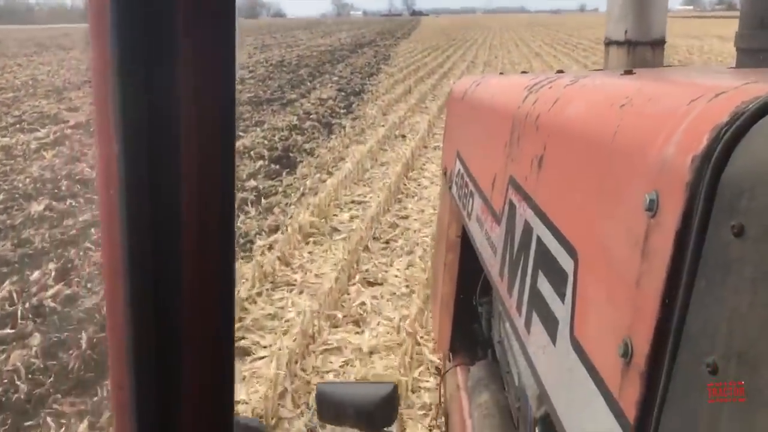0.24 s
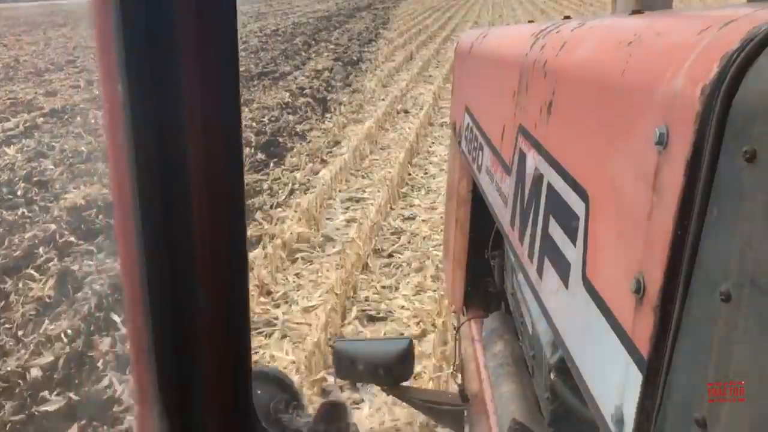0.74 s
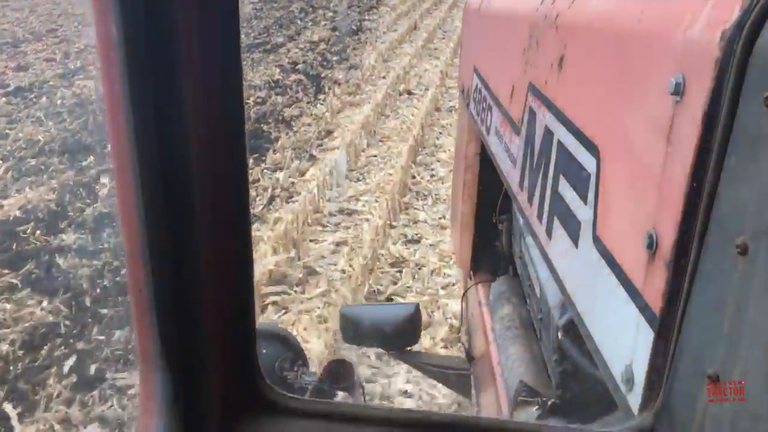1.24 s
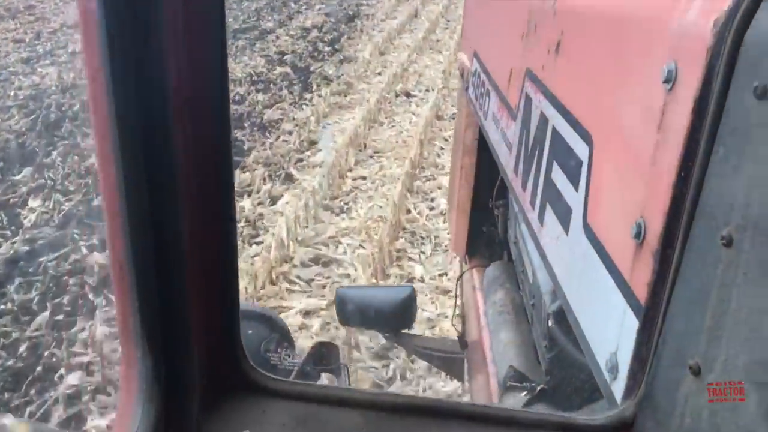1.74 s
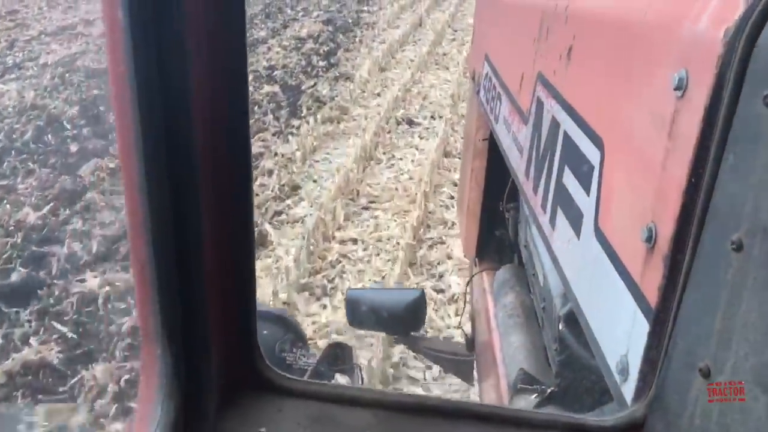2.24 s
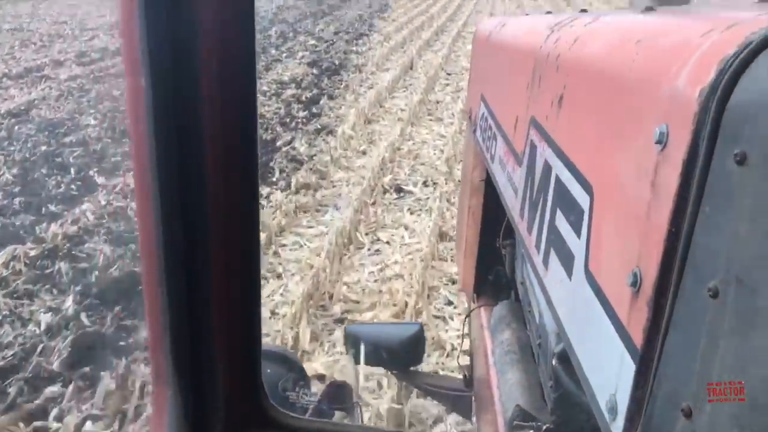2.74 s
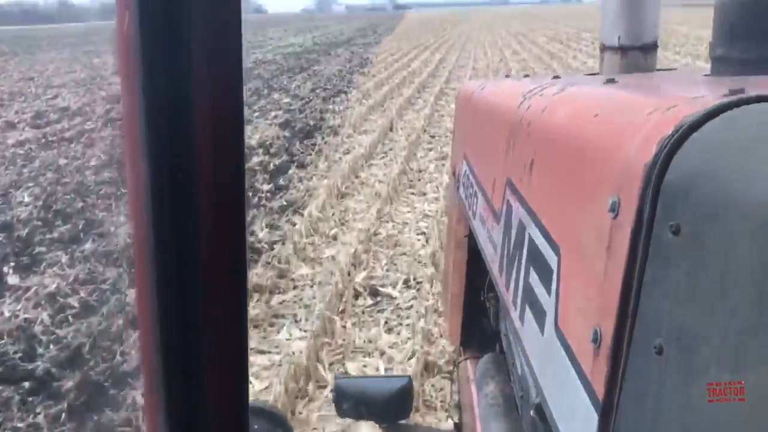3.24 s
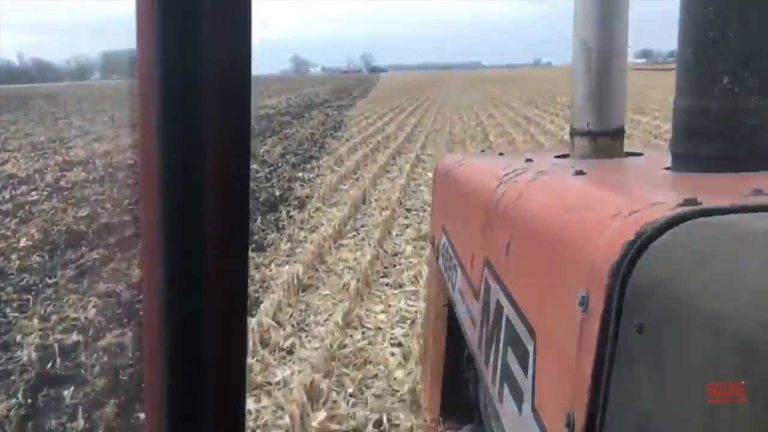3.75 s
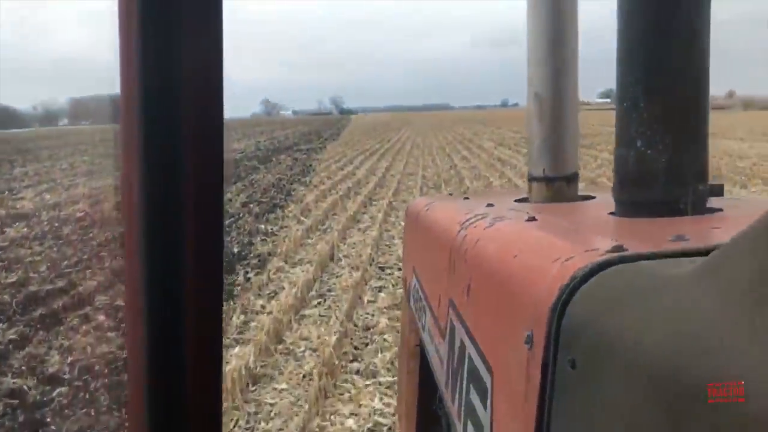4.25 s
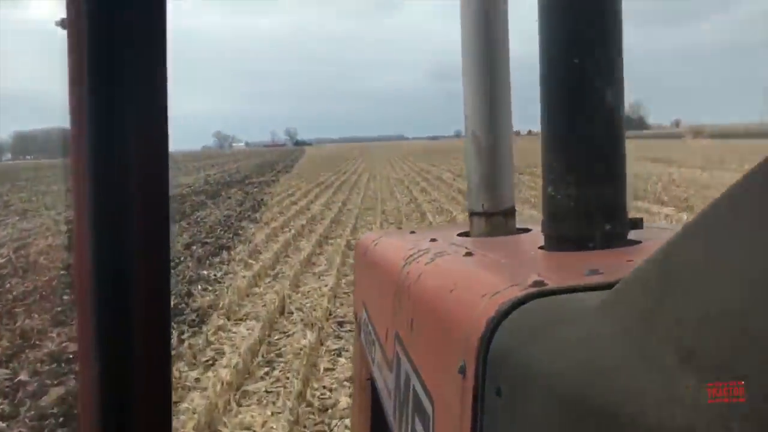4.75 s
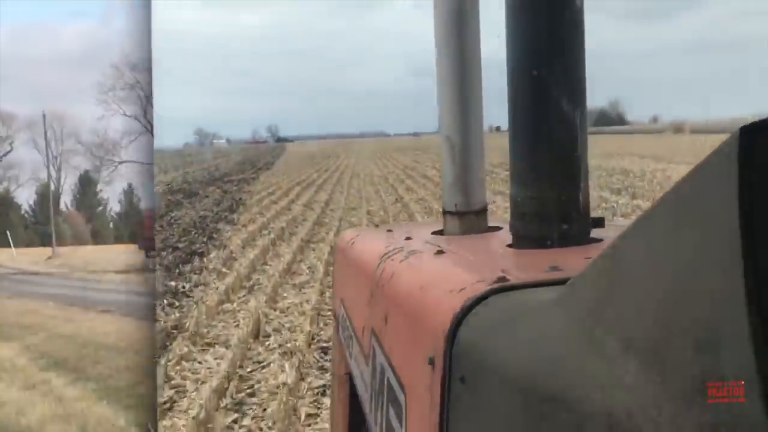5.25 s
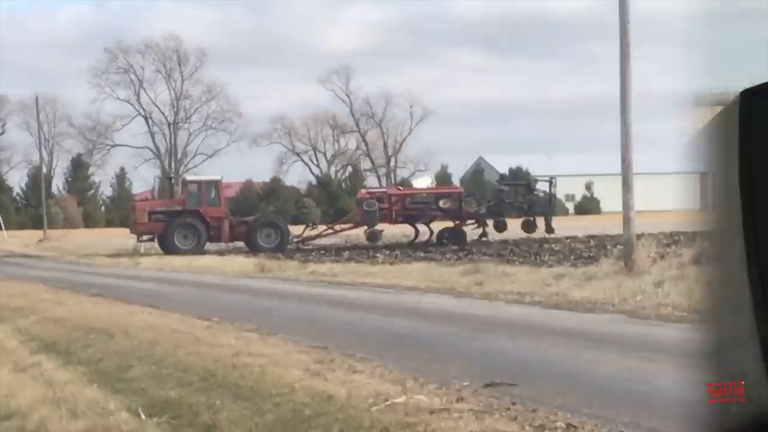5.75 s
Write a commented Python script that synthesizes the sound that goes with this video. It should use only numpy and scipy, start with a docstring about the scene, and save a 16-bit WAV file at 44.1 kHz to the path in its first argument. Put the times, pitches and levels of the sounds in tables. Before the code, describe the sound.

From the start, a large diesel engine drones loudly inside a closed tractor cab, at almost constant speed and load. A strong low firing tone, around 170 hertz, sits among many buzzing engine harmonics, with rough combustion clatter, fan rush and thin mechanical whines above. The small cab adds a short, boxy resonance, and pitch and level waver only slightly. Near 1.1 seconds a tiny trim rattle ticks. From about 3 to 4.7 seconds the handheld microphone turns from the door toward the windscreen; the main tone gradually sinks, other harmonics come forward, and the treble becomes duller. A few more faint rattles come between 5.0 and 5.25 seconds. From 5 seconds the cab smoothly fades away, replaced by 6 seconds with a quieter, distant tractor outdoors: a bassy, gusty, uneven rumble with two low exhaust tones and little treble.

```python
"""Inside the cab of a large V8 diesel tractor at near-steady load: orders of the engine cycle hum under a loud
firing tone (summed cosines), over combustion clatter and fan rush (filtered noise), with a few rattles of trim.
From about 3 s the microphone turns to the windscreen, which rebalances the orders and the noise and sinks the tone.
After 5 s the cab fades out and a tractor far across a field (coloured noise and two steady tones) fades in."""
import sys
import numpy as np
from scipy import signal
from scipy.fft import rfft, irfft, next_fast_len
from scipy.io import wavfile
from scipy.ndimage import uniform_filter1d

SR = 44100
rng = np.random.default_rng(int(sys.argv[2]) if len(sys.argv) > 2 else 0)


def gain_from_db(level_db):
    """Turn a decibel level (scalar or array-like) into a linear amplitude factor."""
    decades = np.asarray(level_db, float) / 20
    return 10 ** decades


def int16_out(signal):
    """Quantize to a 16-bit WAV file."""
    q = np.round(np.clip(np.atleast_2d(signal).T, -1, 1) * 32767)
    wavfile.write(sys.argv[1], SR, q.astype(np.int16))


N = 264625
CYLINDERS = 8  # each fires once an engine cycle


def curve(table):
    """Linear interpolation in time: each column of a table, one value a sample."""
    s, *columns = np.transpose(table)
    return [np.interp(np.arange(N) / SR, s, c) for c in columns]


def unit(x):
    """Normalisation by power: scaled to rms 1."""
    return x / np.sqrt(np.mean(x ** 2))


def walk(rate):
    """Low-passed random process: levels held 1 / rate seconds, smoothed twice, rms 1."""
    hold = int(SR / rate)
    levels = np.repeat(rng.standard_normal(N // hold + 1), hold)
    smooth = uniform_filter1d(uniform_filter1d(levels, hold), hold)
    return unit(smooth[:N])


def colour(x, points):
    """Linear filtering in the frequency domain: a gain in dB interpolated over log frequency."""
    size = next_fast_len(N)
    hz, db = np.transpose(points)
    bins_hz = np.arange(size // 2 + 1) * SR / size
    gain = gain_from_db(np.interp(np.log(bins_hz + 1), np.log(hz), db))
    return irfft(rfft(x, size) * gain, size)[:N]


def far_tractor():
    """Distant source: noise with little treble, in lumpy gusts, and two exhaust tones with wandering levels."""
    # Spectrum of the far engine. Each row: frequency in Hz, relative level in dB
    far_noise = [(18, -37), (35, 1.5), (75, 0), (140, -3.5), (200, -12), (300, -21.5), (800, -17),
                 (1200, -20.5), (1600, -13), (1900, -21), (2300, -24), (2700, -47), (3300, -32),
                 (4200, -50), (6000, -53), (9000, -66)]
    # Exhaust tones. Each row: frequency in Hz, amplitude in dB relative to the rms of the noise before its gusts
    far_tones = [(72, -1), (142, -3.5)]
    far_gain_db = -34
    t = np.arange(N) / SR
    noise = unit(colour(rng.standard_normal(N), far_noise)) * gain_from_db(2.0 * walk(20))
    tones = np.zeros(N)
    for hz, db in far_tones:
        tones += gain_from_db(db + 2.0 * walk(17)) * np.sin(2 * np.pi * hz * t)
    return gain_from_db(far_gain_db) * (noise + tones)


def rattles(decay_s=0.015):
    """Resonant response to impacts: short noise bursts through the resonances of loose cab trim."""
    # Short rattles. Each row: start in seconds, peak of the burst envelope in dB
    bursts = [(1.0984, -37), (5.004, -37.5), (5.2002, -37), (5.243, -35)]
    # Trim resonances. Each row: frequency in Hz, width in Hz, rms of the band in dB before the envelope
    trim = [(3400, 500, -11.5), (5070, 1800, -24), (6800, 1500, -40)]
    t, envelope = np.arange(N) / SR, np.zeros(N)
    for s, db in bursts:
        age = np.clip(t - s, 0, None) / decay_s
        envelope += gain_from_db(db) * age * np.exp(1 - age)
    noise = rng.standard_normal(N)
    ringing = np.zeros(N)
    for hz, width, db in trim:
        b, a = signal.iirpeak(hz, hz / width, fs=SR)
        ringing += gain_from_db(db) * unit(signal.lfilter(b, a, noise))
    return envelope * ringing


def cab_space(x, count=20):
    """Reverberation of a small enclosure: dense decaying reflections, varying as the hand-held microphone moves."""
    echo_db, t60_s = -9, .15
    t = np.arange(int(.2 * SR)) / SR
    place = np.arange(N) / N * (count - 1)
    out = np.zeros(N)
    for k in range(count):
        echoes = rng.standard_normal(len(t)) * np.exp(-np.log(1000) * t / t60_s)
        echoes = echoes / np.linalg.norm(echoes)
        fade = np.cos(np.clip(place - k, -1, 1) * np.pi / 2)  # crossfade between neighbouring patterns
        out += fade * signal.oaconvolve(x, echoes)[:N]
    return unit(x + gain_from_db(echo_db) * out)


def panels(x):
    """Modal response: resonance peaks and dips of the cab panels and glass as bell-shaped gains."""
    # Resonances and dips. Each row: frequency in Hz, width in Hz, gain at the centre in dB
    modes = [(454, 33, -1.5), (476, 270, 0.5), (743, 34, -2.5), (816, 82, -1.5), (1026, 76, 1),
             (1366, 35, 3.5), (1700, 28, -0.5), (1980, 430, 2), (2555, 30, -1), (2760, 150, -3.5),
             (3570, 300, 1), (4940, 500, -4), (7560, 500, -4), (8060, 300, -1), (10500, 510, -5.5)]
    size = next_fast_len(N)
    f = np.arange(size // 2 + 1) * SR / size
    gain_db = sum(db / (1 + (2 * (f - hz) / width) ** 2) for hz, width, db in modes)
    return irfft(rfft(x, size) * gain_from_db(gain_db), size)[:N]


def clatter(cycle, turn, repeat=0.28, beat_db=0.6, flicker_db=.5):
    """Cyclostationary noise: combustion knock and fan rush, part of it repeating each engine cycle."""
    # Cab noise facing the door, then the windscreen. Each row: frequency in Hz, relative level in dB per Hz
    door_noise = [(15, -58), (28, -8), (45, -12), (120, -13.5), (220, -21.5), (274, -19), (389, -12),
                  (509, -24), (970, -15), (1900, -20), (3260, -37.5), (4900, -44), (11800, -49.5),
                  (15500, -58)]
    screen_noise = [(15, -53), (28, -21), (45, -4), (100, -9.5), (190, -13.5), (281, -18), (399, -27.5),
                    (523, -22), (1450, -19.5), (2360, -29), (3830, -47.5), (6000, -47.5), (12200, -54),
                    (15500, -61)]
    glass_ms, glass_share = .38, 0.085  # delay and amplitude of the reflection
    pattern = rng.standard_normal(2048)  # one engine cycle of knock
    locked = pattern[(cycle / (2 * np.pi) % 1 * 2048).astype(int)]
    # the noise swells slightly once each engine cycle, away from the crest of the low orders
    swell_db = beat_db * np.cos(cycle + 2.2) + flicker_db * walk(7.3)
    rush = rng.standard_normal(N) * gain_from_db(swell_db) + repeat * locked
    rush = cab_space(rush)
    # the treble flickers on its own
    low = signal.sosfilt(signal.butter(2, 4000, fs=SR, output="sos"), rush)
    treble = (rush - low) * gain_from_db(.45 * walk(12))
    rush = panels(low + treble)
    door, screen = unit(colour(rush, door_noise)), unit(colour(rush, screen_noise))
    noise = (1 - turn) * door + turn * screen
    # a pane close to the microphone reflects the sound and combs the treble
    return noise + glass_share * np.roll(noise, int(glass_ms * SR / 1000))


def hum(cycle, turn):
    """Fourier series of a periodic source: uneven cylinders excite multiples of the cycle; shaking panels waver them."""
    # Engine orders facing the door, then the windscreen. Each row: multiple of the cycle rate, relative level in dB
    door_orders = [(2, -13), (3, -13), (4, -13), (5, -13), (6, -11), (7, -14), (9, -18), (10, -17),
                   (11, -16), (12, -26), (13, -22), (14, -22), (15, -22), (16, -16), (17, -25), (18, -21),
                   (19, -20), (20, -25)]
    screen_orders = [(2, -16), (3, -12), (4, -21), (5, -12), (6, -10), (7, -15), (9, -15), (10, -14),
                     (11, -10), (12, -27), (13, -24), (14, -13), (15, -30), (16, -5), (17, -31), (18, -28),
                     (19, -22), (20, -27)]
    # Gear and pump whines locked to the crank. Each row: multiple of the cycle rate, relative level in dB
    # facing the door, relative level in dB facing the windscreen
    whines = [(17.6, -21.5, -23), (19.33, -22, -27), (31.22, -25.5, -21.5), (34.15, -20.5, -26),
              (39.52, -26.5, -24.5), (42.65, -26.5, -31), (45.1, -18, -35), (58.06, -23.5, -17.5),
              (76.6, -25.5, -23), (114, -51, -52)]
    waver_db, slip_rad = 1.2, .55  # rms wander of each order
    out = np.zeros(N)
    for (k, door_db), (_, screen_db) in zip(door_orders, screen_orders):
        # one cylinder fires hardest, so the orders crest together
        lag = slip_rad * walk(3)
        # the cab boom holds orders between the firing tone and its octave back by one firing and more
        if CYLINDERS < k < 2 * CYLINDERS:
            lag = lag - (2.5 + 2 * np.pi * k / CYLINDERS)
        # facing the windscreen turns the phase of the octave
        if k == 2 * CYLINDERS:
            lag = lag - 2.4 * turn
        db = door_db + turn * (screen_db - door_db) + waver_db * walk(4.03)
        out += gain_from_db(db) * np.cos(k * cycle + lag)
    for k, door_db, screen_db in whines:
        db = door_db + turn * (screen_db - door_db) + 1.2 * walk(3.85)
        out += gain_from_db(db) * np.cos(k * cycle + 1.44 * walk(5))
    return out


def firing_tone(cycle, turn):
    """Firing frequency: one cosine at eight times the cycle rate, which sinks only late in the turn."""
    door_db, screen_change_db, null_power = -22.5, -15.5, 9  # rms at the door, change at full turn
    db = door_db + screen_change_db * turn ** null_power + .5 * walk(10)
    return np.sqrt(2) * gain_from_db(db) * np.cos(CYLINDERS * cycle)


def engine_cycle():
    """Phase as the integral of frequency: the engine cycle in radians, with slight random unsteadiness."""
    # The governor hunts as the tines meet harder and softer soil.
    # Each row: time in seconds, engine cycles a second
    engine = [(0, 21.6), (.35, 21.47), (.95, 21.66), (1.4, 21.72), (2, 21.71), (2.3, 21.58), (2.9, 21.67),
              (3.5, 21.8), (3.7, 21.63), (4.8, 21.68), (5.15, 21.82), (6, 21.82)]
    rate = curve(engine)[0] * (1 + .001 * walk(12))
    return 2 * np.pi * np.cumsum(rate) / SR


def scene():
    """Superposition of sources: firing tone, hum and clatter, cross-faded into the far tractor, plus rattles."""
    # Turn of the microphone. Each row: time in seconds, share of the turn from door (0) to windscreen (1)
    turning = [(0, 0.13), (3, 0.12), (4.7, 0.86), (5.6, 0.93)]
    cab_gain_db, screen_change_db = -31.5, 0.66  # gain at the door, change at full turn
    orders_db, clatter_db = 10, 4.0  # balance within the cab
    fade_start_s, fade_s = 5.005, 1.063
    turn = np.clip(curve(turning)[0], 0, 1)
    cycle = engine_cycle()
    tone = firing_tone(cycle, turn)
    cab = gain_from_db(orders_db) * hum(cycle, turn) + gain_from_db(clatter_db) * clatter(cycle, turn)
    cab = gain_from_db(cab_gain_db + screen_change_db * turn) * cab
    progress = np.clip((np.arange(N) / SR - fade_start_s) / fade_s, 0, 1)
    field = np.sin(progress * np.pi / 2) ** 2
    mix = (1 - field) * (tone + cab) + rattles() + field * far_tractor()
    return mix[None]


def roll_off(x):
    """The treble ends steeply here."""
    return signal.sosfilt(signal.butter(12, 15740, fs=SR, output="sos"), x)


def record(dry):
    """Single-channel pickup: the mix passes on at its own level and spectrum."""
    return roll_off(dry)


dry = scene()
out = record(dry)
int16_out(out)
```